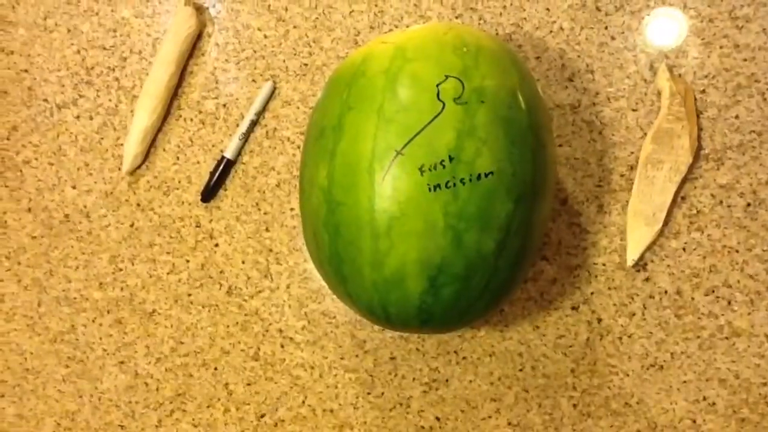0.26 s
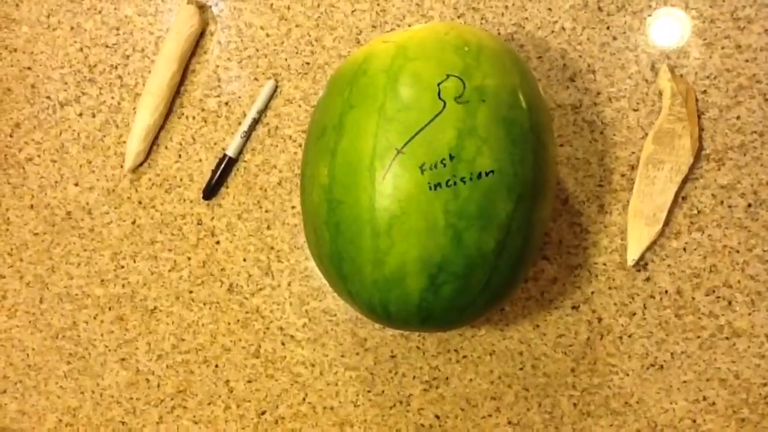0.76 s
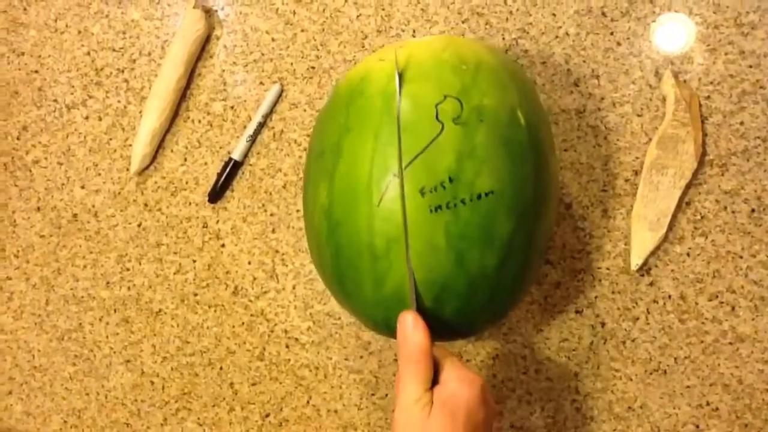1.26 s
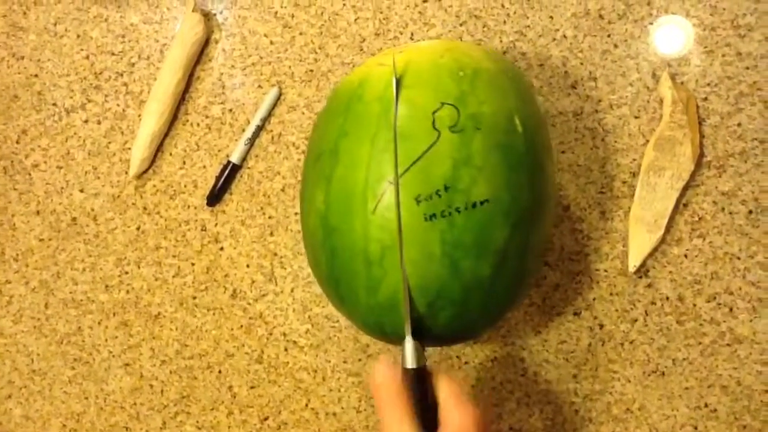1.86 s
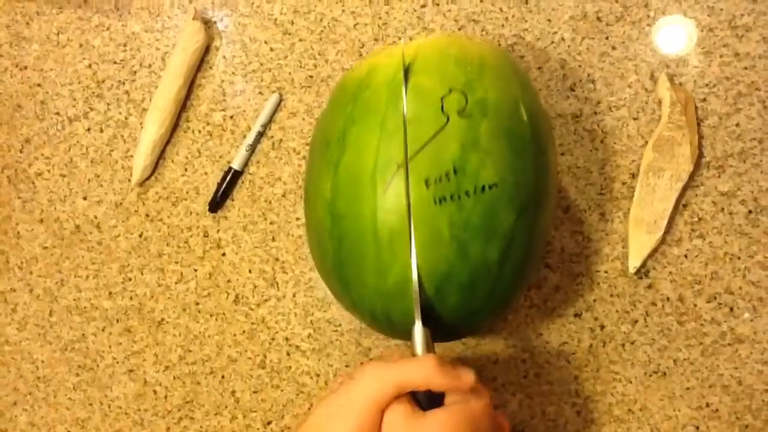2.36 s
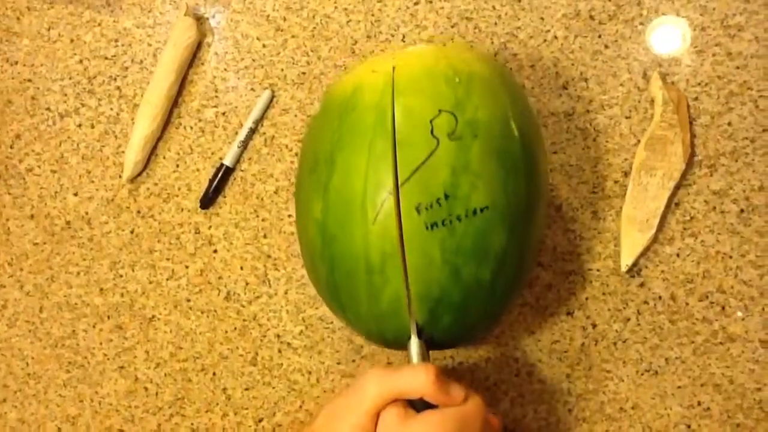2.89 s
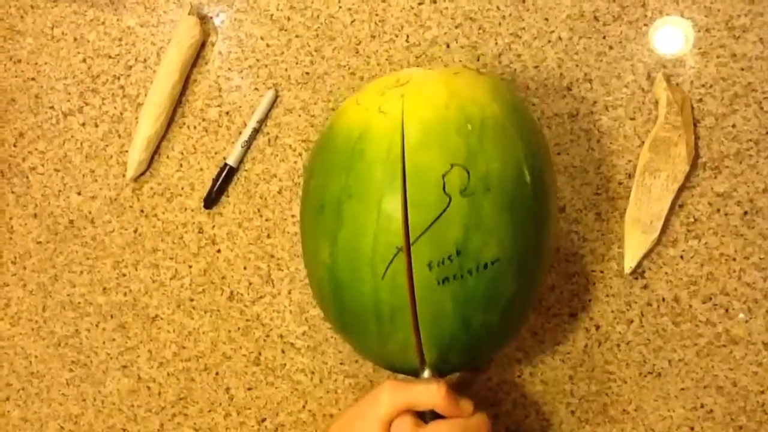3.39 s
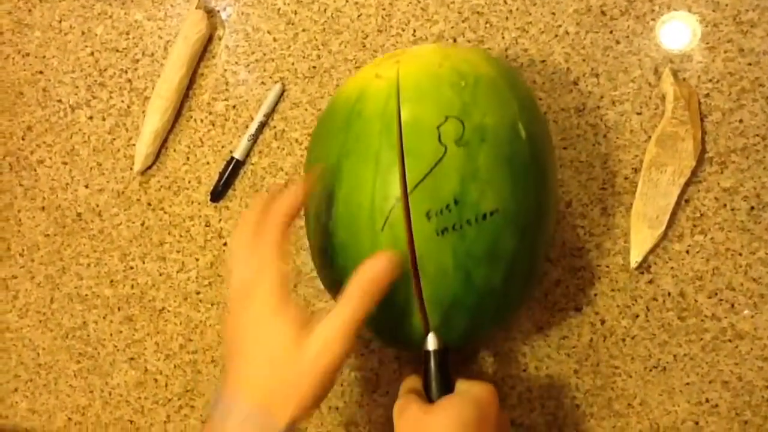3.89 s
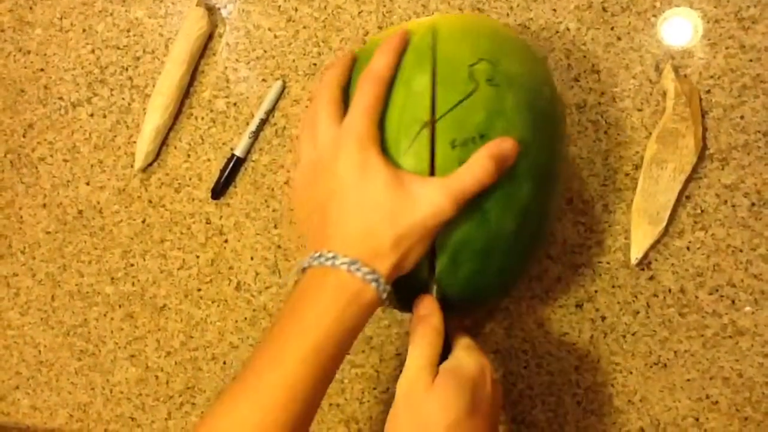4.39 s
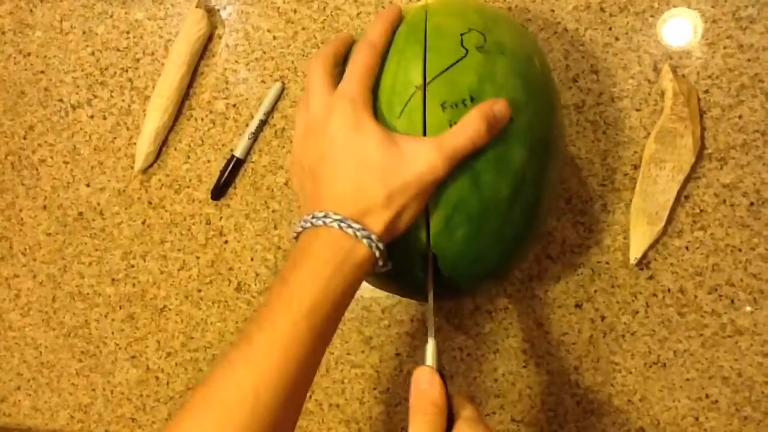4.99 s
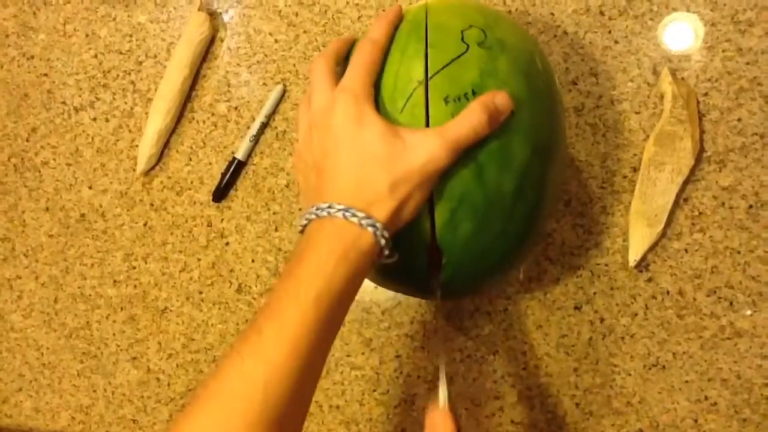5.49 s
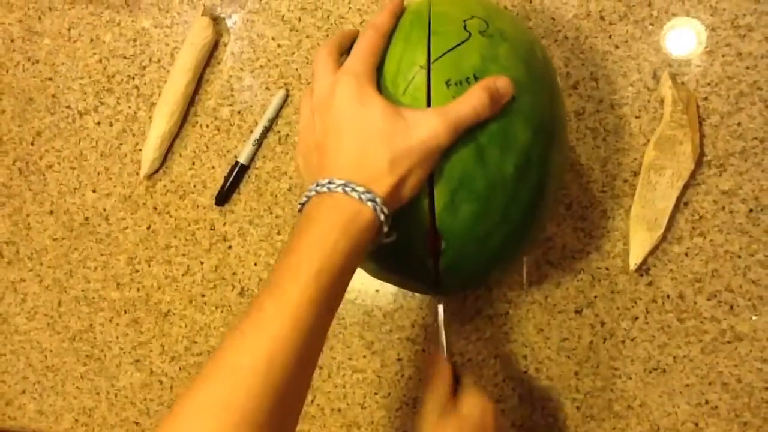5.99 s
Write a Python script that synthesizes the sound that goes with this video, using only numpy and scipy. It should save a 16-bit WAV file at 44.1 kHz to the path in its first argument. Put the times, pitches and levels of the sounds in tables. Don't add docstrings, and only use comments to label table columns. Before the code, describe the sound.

Close up in a small hard-walled kitchen, a blade slams into a watermelon with a bright click and woody, hollow ring. Soft handling follows, then a faint squeak and a rough tearing push with dull thuds on the stone counter. After another lull come a sharp cracking push and five quick sawing strokes, juicy, gritty and full of snapping fibres, over steady hum and hiss.

```python
import sys
import numpy as np
from scipy import signal
from scipy.fft import rfft, irfft
from scipy.io import wavfile

SR = 44100
rng = np.random.default_rng(int(sys.argv[2]) if len(sys.argv) > 2 else 0)


def invert_db(level):
    return 10 ** (np.asarray(level, dtype=float) / 20)


def dump_mix(stems):
    frames = np.atleast_2d(stems).T
    limited = np.clip(frames, -1, 1)
    pcm = np.round(limited * 32767).astype(np.int16)
    wavfile.write(sys.argv[1], SR, pcm)


N = 275625

# pitch_hz, level_db
FLOOR_COLOUR = [(15, -73.5), (25, -61.5), (59, -40.5), (75, -19), (128, -14), (163, 0), (197, 0.5),
                (311, -1.5), (518, -12), (862, -14.5), (1510, -22.5), (2960, -24), (3480, -26.5),
                (8200, -27.5), (15200, -28.5)]
FLOOR_DB = -54
# pitch_hz, width_hz, level_db (above the floor)
WHINES = [
    (91.2, 4.6, -25.5),
    (3280, 5, -28.5),
    (2900, 40, -29.5),
]
# peak_s, rustle_db, swell_s, fade_s, dull_db (dull part above the rustle)
RUSTLE = [(0.0, -64.5, .1, .25, -3), (.212, -58.5, 0.27, 0.18, -9), (.326, -58, .3, .25, -9),
          (.736, -61.5, 0.53, 0.7, 2.5), (1.77, -62.5, .2, .02, 1), (1.852, -61.5, 0.065, .035, -12),
          (2.13, -76.5, 0.5, .6, 9.5), (3.45, -62, 0.055, .12, -7), (3.606, -62, 0.032, 0.33, -5),
          (3.986, -65, 0.32, 0.34, -6), (4.35, -72, .35, .1, 1)]
# start_s, peak_db, pitch_hz, width_share (of the pitch)
CRACKS = [(0.977, -41.5, 890, 0.55), (1.74, -41.5, 2190, 0.46), (2.06, -47, 778, 0.12),
          (3.169, -29, 1440, .3), (3.177, -29, 1470, 0.17), (3.2, -24, 1440, .3), (3.206, -27, 1560, 0.29),
          (3.223, -33.5, 870, 0.077), (3.289, -27, 2100, 0.21), (4.433, -46, 1110, .3),
          (4.617, -46, 1820, .3), (4.685, -41, 1720, .34), (4.736, -36.5, 1160, 0.21),
          (4.753, -35, 950, 0.37), (4.764, -26, 1970, 0.093), (5.494, -40, 1220, .21),
          (5.768, -43, 1160, 0.17)]
# start_s, peak_db, pitch_hz, width_share (of the pitch)
SNAPS = [(1.3158, -39, 6730, 0.47), (1.6994, -48, 6730, .4), (2.4487, -50, 4790, .4),
         (3.1687, -23, 4630, 0.52), (3.1784, -37, 4550, .35), (3.1924, -29, 4480, .4),
         (3.199, -37, 3740, .4), (3.2234, -26, 3700, .4), (3.417, -36, 7500, .8), (3.6017, -37, 7150, 0.99),
         (3.6473, -38.5, 10700, 0.74), (4.431, -33, 8610, 0.53), (4.6137, -37, 7300, .4),
         (4.7638, -27, 9650, .4), (5.128, -25.5, 5250, 0.21), (5.3887, -36, 10400, .37),
         (5.5412, -30, 9150, 0.52), (5.7958, -33, 5610, 0.29), (6.0104, -38, 4640, .4),
         (6.0174, -32, 6860, .47), (6.024, -38, 5340, .4), (6.0354, -32, 9080, .61),
         (6.2127, -42.5, 9500, .4), (6.238, -44, 9310, 0.43)]
# start_s, peak_db, pitch_hz,
# spray_ms, width_share (of the pitch)
TICKS = [(4.7505, -22, 9700, 5.7, 0.15), (4.753, -24, 8200, 4.4, .2), (4.752, -31, 4200, 4.0, 0.14),
         (2.804, -40, 4200, 5.0, 0.27), (4.783, -30, 9000, 1.5, .3), (5.129, -26, 3400, 0.4, 0.42),
         (5.389, -27, 14600, 3.0, .1), (7.2, -34, 2500, .6, .8), (5.543, -31, 5700, 2.0, 0.18),
         (5.135, -34, 4500, 4.0, .5), (3.042, -45, 5500, 2.0, .7), (5.274, -49, 2800, 1.5, .3),
         (5.5336, -23, 7600, .8, .55),
    (5.7714, -17, 7000, .3, .9),
    (4.7826, -19, 2150, 2.5, .18),
    (4.7826, -19, 2930, 2.5, .16),
    (3.1692, -24, 2300, 3.0, .35),
    (4.6512, -33, 1300, 1.2, .5),
    (4.6514, -39, 4300, 1.0, .4),
]
SNAP_SPRAY_MS, CRACK_SPRAY_MS = 4.4, 4.4
# start_s, peak_db, pitch_hz, ring_cycles
BLOW = [
    (1.07497, 7, 2150, 4.4),
    (1.0760, -4, 2900, 6.0),
    (1.0779, 1, 950, 5.0),
    (1.0797, -3, 1000, 2.6),
    (1.0847, -6, 1300, 2.6),
]
# pitch_hz, level_db, t60_s
BODY = [
    (316.3, -25.5, 0.3),
    (343, -20, 0.16),
    (584.4, -12, 0.057),
    (1056, -21, 0.12),
    (1657, -16, 0.026),
    (2070, -20, 0.048),
    (181.4, -29.5, 0.19),
]
# pitch_hz, width_hz, level_db
EDGE = [
    (10500, 4700, -1),
    (5500, 3000, -21),
]
# low_hz, high_hz, level_db
BLOW_SPREAD = [
    (200, 885, 9.5),
    (714, 2430, 10.5),
    (2650, 4100, -7.5),
    (4930, 22000, -3.5),
]
SPLINTER_DB, SPLINTER_T60_S = -17.5, 0.029
# pitch_hz, t60_s, level_db
KITCHEN = [
    (137, 0.37, 1.5),
    (294, 0.5, -3.5),
    (590, 0.52, 2.5),
    (1200, 0.55, -4),
    (2520, 0.43, -4.5),
    (4700, 0.42, -6.5),
    (9120, 0.29, -8),
    (15000, .22, -10.5),
]
WET_DB = -2
# start_s, end_s, start_hz, end_hz, level_db
SQUEAKS = [
    (2.468, 2.53, 2170, 2150, -65.5),
    (2.46, 2.83, 4520, 4200, -73.5),
]
# start_s, end_s, start_hz, end_hz, level_db
BLADE = [(2.792, 2.848, 4650, 4680, -47.5), (2.84, 2.96, 4760, 4700, -68), (2.78, 2.85, 1132, 1093, -56),
         (3.167, 3.179, 4650, 4650, -38.5), (4.55, 4.62, 7170, 7000, -62.5), (4.643, 4.7, 7250, 7400, -58),
         (5.058, 5.141, 2910, 2850, -53.5), (5.322, 5.36, 3340, 3500, -49.5),
         (5.348, 5.417, 1934, 1455, -50), (5.456, 5.582, 1250, 1350, -57.5),
         (5.75, 5.823, 1200, 1200, -57.5), (5.978, 6.036, 9440, 9500, -56),
         (6.109, 6.224, 1350, 1268, -62.5)]
SQUEAK_WIDTH_HZ = 120
RUB_WIDTH_HZ, RUB_WIDENS = 250, 0.41
# peak_s, fizz_db, swell_s, fade_s, depth_db (rind crunch above fizz)
PRESSING = [(2.47, -68.5, .3, 1, 5.5), (2.97, -67.5, 0.32, 0.26, 4), (4.44, -62, 0.12, .2, -13),
            (4.61, -55.5, 0.57, .3, -9.5), (4.72, -49, 0.16, .05, -1.5), (4.82, -64, .02, .3, 0),
            (5.25, -62.5, 0.32, 0.44, 3.5), (5.46, -63, 0.25, 0.25, 6.5), (5.67, -67, 0.18, 0.25, 7),
            (5.88, -63.5, 0.22, .15, -2), (6.146, -65.5, .1, .1, 7), (6.222, -59, 0.13, 0.088, -9)]
# peak_s, fizz_db, swell_s, fade_s, depth_db
PUSHES = [
    (2.81, -43.5, 0.022, 0.055, -2),
    (3.171, -39, 0.011, 0.12, 2),
    (3.209, -46, 0.046, 0.14, 9),
    (3.261, -57, .03, 0.077, 16.5),
    (3.414, -58, 0.033, 0.018, -13),
    (4.75, -38.5, 0.03, 0.05, -9),
]
# peak_s, fizz_db, swell_s, fade_s, depth_db
SAWING = [
    (5.095, -50, 0.044, 0.069, -10),
    (5.128, -50, .05, 0.048, -1.5),
    (5.327, -46.5, 0.01, 0.15, -5),
    (5.372, -46.5, 0.072, 0.054, 2.5),
    (5.536, -45, .01, 0.12, -11),
    (5.581, -48.5, 0.07, 0.024, 1),
    (5.746, -49, 0.035, .06, -4.5),
    (5.769, -46, .01, 0.074, -4.5),
    (5.986, -52, 0.038, .1, 1),
    (6.022, -48.5, 0.077, 0.062, -1),
]
# level_db (above the fizz), depth_share (it gains), fade_factor (how much longer it fades)
FIZZ = (-3.8, 0.0, 0.76)
TEARING = (-5, 0.21, 0.82)
CRUNCH = (-2.53, 1.0, 1.02)
HOLLOW = (-12, 1.4, 1)
SWELL_DB = 20
HOLD_S = 0.014
# start_s, peak_db, pitch_hz, ring_cycles
THUDS = [
    (3.2055, -26, 420, 5.0),
    (3.212, -26, 380, 6.0),
    (3.2508, -15, 370, 4.0),
    (3.2585, -23, 370, 5.0),
    (3.291, -27, 380, 6.0),
    (4.766, -28, 343, 8.0),
    (4.788, -32, 554, 7.0),
]
DUCK_DB, RECOVER_S = -2.5, 0.74
MIC_BASS_HZ = 167


def rms_one(x):
    return x / np.sqrt(np.mean(x ** 2) + 1e-20)


def band(x, low_hz, high_hz):
    edges_hz = [low_hz, min(high_hz, .45 * SR)]
    return signal.sosfilt(signal.butter(2, edges_hz, "band", fs=SR, output="sos"), x)


def resonance(x, hz, width_hz):
    r = np.exp(-np.pi * width_hz / SR)
    top = (1 - r * r) / 2
    return signal.lfilter([top, 0, -top], [1, -2 * r * np.cos(2 * np.pi * hz / SR), r * r], x)


def add(out, start_s, sound):
    i = round(start_s * SR)
    out[i:i + len(sound)] += sound[:N - i]


def ring(db, hz, t60_s):
    t = np.arange(round(t60_s * SR)) / SR
    swell = 1 - np.exp(-3 * hz * t)
    return invert_db(db - 60 * t / t60_s) * np.sin(2 * np.pi * hz * t) * swell


def drift(rate_hz):
    low_pass = signal.butter(2, rate_hz, fs=SR, output="sos")
    return rms_one(signal.sosfilt(low_pass, rng.standard_normal(N + 4000))[4000:])


def gesture(peak_s, db, swell_s, fade_s):
    t = np.arange(0, N, 16) / SR - peak_s
    below = np.maximum(-t / swell_s, (t - HOLD_S) / fade_s)
    return invert_db(2 * (db - SWELL_DB * np.maximum(below, 0)))


def gain(power):
    return np.interp(np.arange(N) / 16, np.arange(len(power)), np.sqrt(power))


def floor():
    hz = np.maximum(np.fft.rfftfreq(N, 1 / SR), 1)
    points = np.array(FLOOR_COLOUR)
    colour = invert_db(np.interp(np.log(hz), np.log(points[:, 0]), points[:, 1]))
    colour *= np.sqrt(1 + (MIC_BASS_HZ / np.maximum(hz, 30)) ** 6)
    out = rms_one(irfft(rfft(rng.standard_normal(N)) * colour, N))
    for hz, width_hz, db in WHINES:
        whine = resonance(resonance(rng.standard_normal(N), hz, width_hz), hz, width_hz)
        out += invert_db(db) * rms_one(whine)
    return invert_db(FLOOR_DB) * out


def rustle():
    noise = rng.standard_normal((2, N))
    hiss = rms_one(band(noise[0], 2500, 11000))
    shuffle = rms_one(band(noise[1], 434, 2230))
    bright, dull = 0, 0
    for peak_s, db, swell_s, fade_s, dull_db in RUSTLE:
        bright = bright + gesture(peak_s, db - 5.5, swell_s, fade_s)
        dull = dull + gesture(peak_s, db - 4.5 + dull_db, swell_s, fade_s)
    return gain(bright) * hiss + gain(dull) * shuffle


def breaks(table):
    out = np.zeros((2, N))
    t = np.arange(900) / SR
    for start_s, db, hz, spray_ms, width in table:
        slips = rng.standard_normal(900) + 6.0 * (t == 0)
        spray = slips * invert_db(-20 * t * 1000 / spray_ms)
        near = resonance(resonance(spray, hz, width * hz), hz, width * hz)
        broad = resonance(spray * invert_db(-20 * t * 1000 / 1.5), hz, 2 * width * hz)
        level = invert_db(db - 3.5) / np.abs(near).max()
        add(out[0], start_s, level * near)
        add(out[1], start_s, level * rms_one(broad) * np.std(near))
    return out


def blow():
    out = np.zeros((2, N))
    t = np.arange(1500) / SR
    blow_s = BLOW[0][0]
    for start_s, db, hz, cycles in BLOW:
        add(out[0], start_s, ring(db, hz, cycles / hz))
    for hz, db, t60_s in BODY:
        add(out[0], blow_s + 0.0013, ring(db, hz, t60_s))
    contact = 1. * (t == 0)
    splinters = rng.standard_normal(1500) * invert_db(SPLINTER_DB - 60 * t / SPLINTER_T60_S)
    edge = sum(invert_db(db) * resonance(contact, hz, width_hz) for hz, width_hz, db in EDGE)
    add(out[0], blow_s + .0001, band(splinters, 3800, 12000) + edge)
    for low_hz, high_hz, db in BLOW_SPREAD:
        add(out[1], blow_s, invert_db(db + 16.0) * band(contact, low_hz, high_hz))
    return out


def kitchen(x):
    t = np.arange(SR // 2 + SR // 4) / SR
    tail = np.zeros(len(t))
    for hz, t60_s, db in KITCHEN:
        noise = band(rng.standard_normal(len(t)), hz / 1.16, hz * 1.472)
        tail += invert_db(db - 60 * t / t60_s) * noise
    tail *= np.clip((t - .005) / .006, 0, 1) / np.sqrt(SR * .03)
    tail *= invert_db(1.6 * drift(120)[:len(t)])
    return invert_db(WET_DB) * signal.fftconvolve(x, tail)[:N]


def blade():
    out = np.zeros(N)
    rubs = [(*row, SQUEAK_WIDTH_HZ) for row in SQUEAKS]
    rubs += [(*row, RUB_WIDTH_HZ * (row[2] / 1000) ** RUB_WIDENS) for row in BLADE]
    for start_s, end_s, start_hz, end_hz, db, width_hz in rubs:
        hz = np.linspace(start_hz, end_hz, round((end_s - start_s) * SR))
        low_pass = signal.butter(2, width_hz / 2, fs=SR, output="sos")
        rub = signal.sosfilt(low_pass, rng.standard_normal((2, SR // 2)))
        cos_part, sin_part = rub[:, :len(hz)]
        turn = 2 * np.pi * np.cumsum(hz) / SR
        song = rms_one(cos_part * np.cos(turn) + sin_part * np.sin(turn))
        add(out, start_s, invert_db(db) * np.sqrt(np.hanning(len(hz))) * song)
    return out


def crackle(per_s, low_hz, high_hz, cycles, spread_db, clump_db, tilt_db, count):
    sizes = invert_db(spread_db * np.minimum(rng.exponential(1, N), 4)) * rng.choice([-1, 1], N)
    happens = rng.random(N) < per_s / SR
    bursts = sizes * invert_db(clump_db * drift(63)) * happens
    dealt = rng.integers(0, count, N)
    out = np.zeros(N)
    for k, hz in enumerate(np.geomspace(low_hz, high_hz, count)):
        level = invert_db(tilt_db * np.log2(hz / low_hz))
        out += level * resonance(bursts * (dealt == k) + 1e-18, hz, hz / cycles)
    return rms_one(out)


def strokes():
    fizz = crackle(7000, 6600, 10700, cycles=2.4, spread_db=3.0, clump_db=0.5, tilt_db=0.0, count=6)
    tearing = crackle(2500, 2600, 5500, cycles=1.5, spread_db=2.5, clump_db=0.0, tilt_db=-4.5, count=5)
    crunch = crackle(1200, 898, 2530, cycles=5.7, spread_db=2.0, clump_db=1.5, tilt_db=-2.0, count=8)
    hollow = crackle(600, 340, 720, cycles=9.7, spread_db=3.0, clump_db=4.5, tilt_db=-3.0, count=4)
    layers = [(fizz, FIZZ), (tearing, TEARING), (crunch, CRUNCH), (hollow, HOLLOW)]
    out = np.zeros(N)
    for sound, (above_db, share, longer) in layers:
        power = 0
        for peak_s, db, swell_s, fade_s, depth_db in PRESSING + PUSHES + SAWING:
            level_db = db + above_db + share * depth_db
            power = power + gesture(peak_s, level_db, swell_s, longer * fade_s)
        out += gain(power) * sound
    return out


def thuds():
    out = np.zeros(N)
    for start_s, db, hz, cycles in THUDS:
        add(out, start_s, -ring(db, hz, cycles / hz))
    return band(out, 140, 3000)


def scene():
    snaps = [(s, db, hz, SNAP_SPRAY_MS, width) for s, db, hz, width in SNAPS]
    cracks = [(s, db, hz, CRACK_SPRAY_MS, width) for s, db, hz, width in CRACKS]
    sharp = blow() + breaks(snaps + cracks + TICKS)
    near, spread = sharp + strokes() + blade() + thuds()
    return (near + kitchen(spread) + rustle() + floor())[None]


def band_limit(x):
    return signal.sosfilt(signal.butter(12, 16460, fs=SR, output="sos"), x)


def record(dry):
    since_s = np.arange(N) / SR - BLOW[0][0]
    duck_db = DUCK_DB * np.clip(since_s / 0.02, 0, 1) * np.clip(1.6 - since_s / RECOVER_S, 0, 1)
    bass_cut = signal.butter(3, MIC_BASS_HZ, "high", fs=SR, output="sos")
    top_cut = signal.cheby2(16, 40, 15650, fs=SR, output="sos")
    x = signal.sosfilt(bass_cut, dry * invert_db(duck_db))
    x = signal.sosfilt(top_cut, x)
    mix = np.clip(x, -.94, .94)
    return band_limit(mix)


dry = scene()
out = record(dry)
dump_mix(out)
```